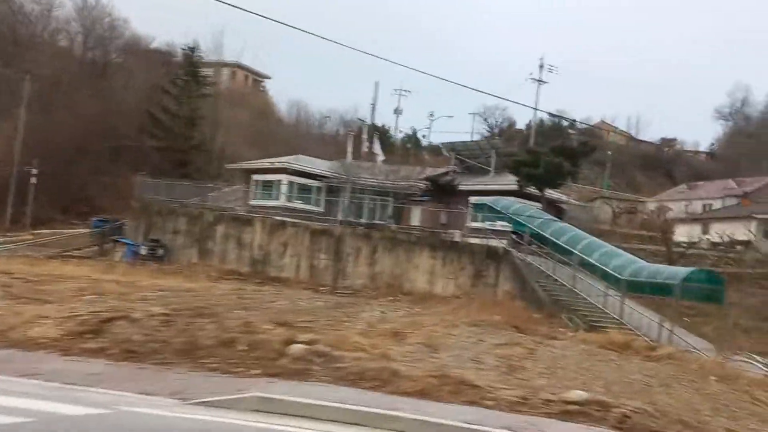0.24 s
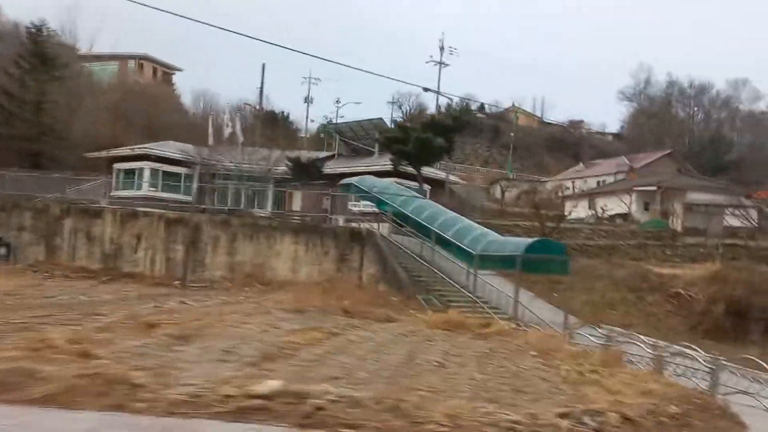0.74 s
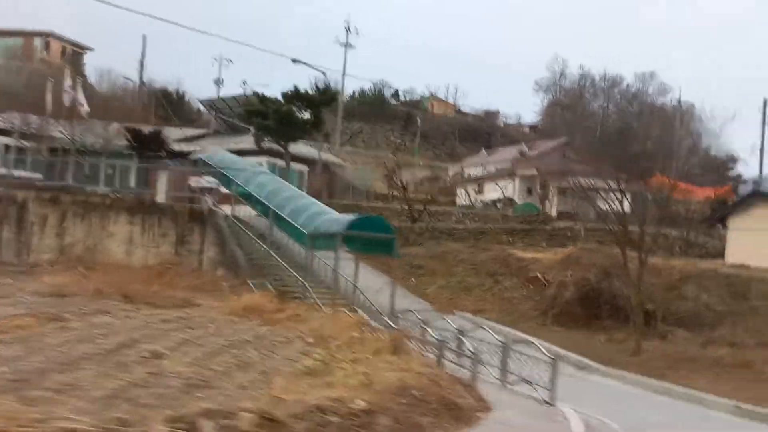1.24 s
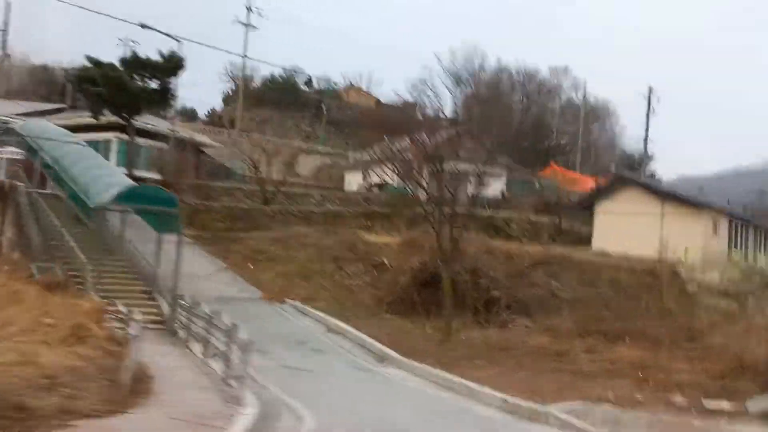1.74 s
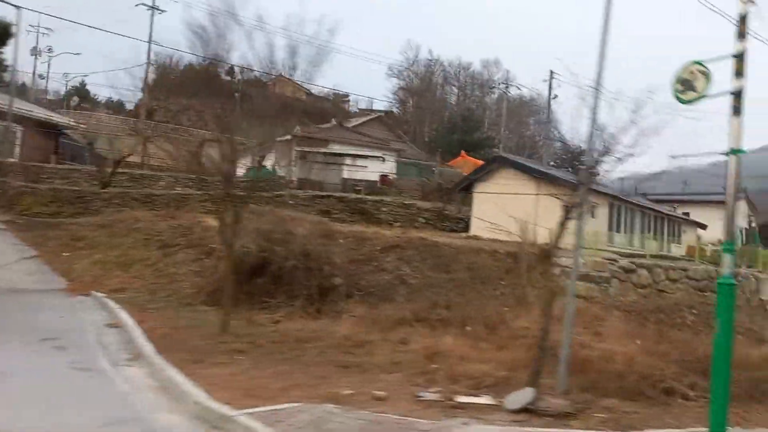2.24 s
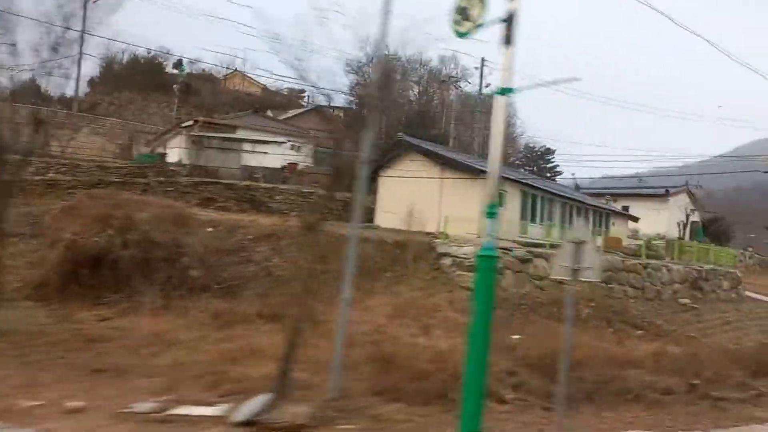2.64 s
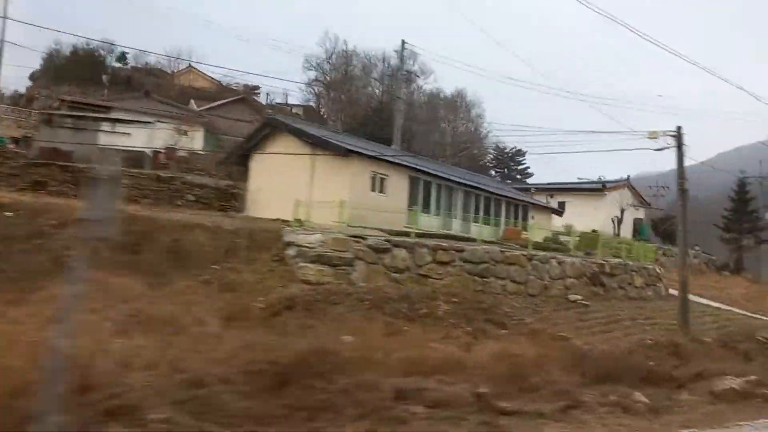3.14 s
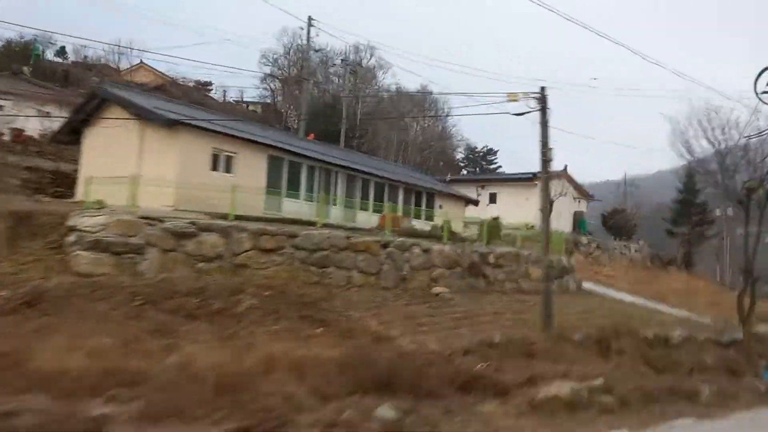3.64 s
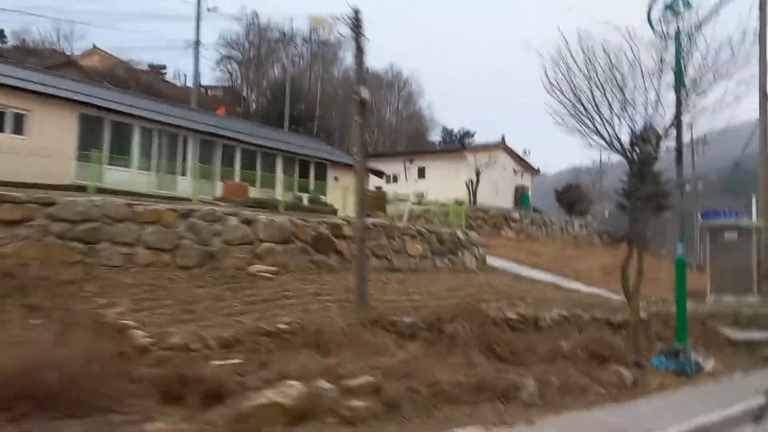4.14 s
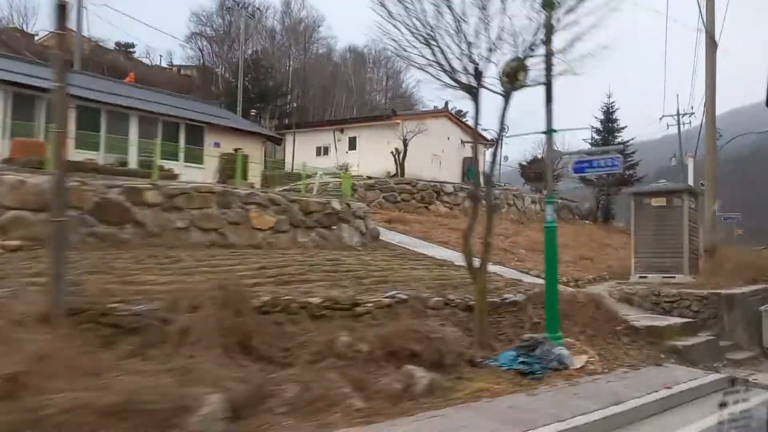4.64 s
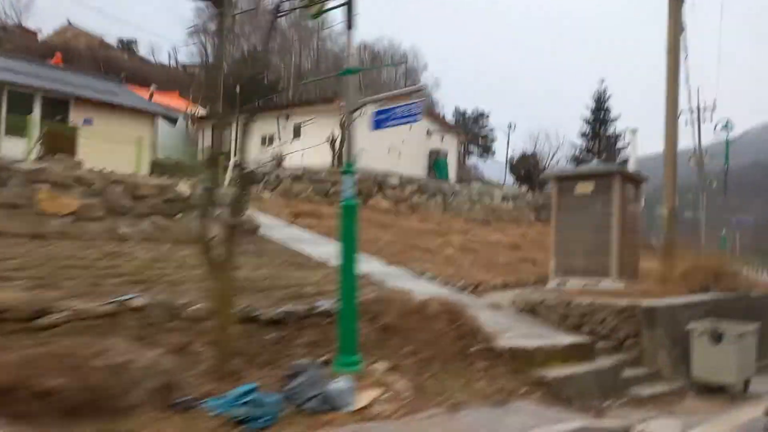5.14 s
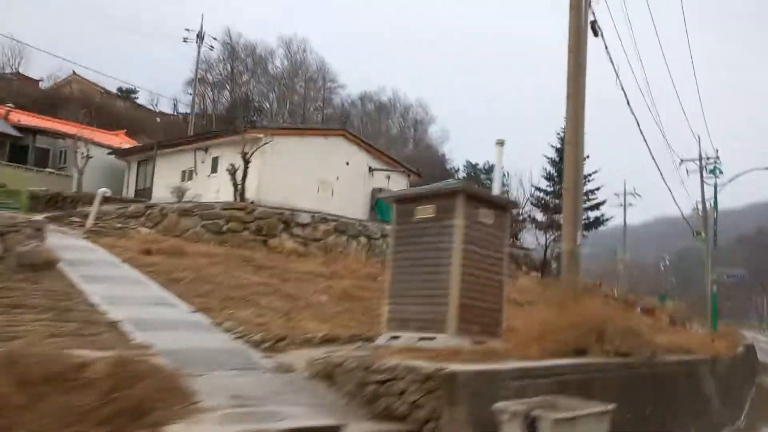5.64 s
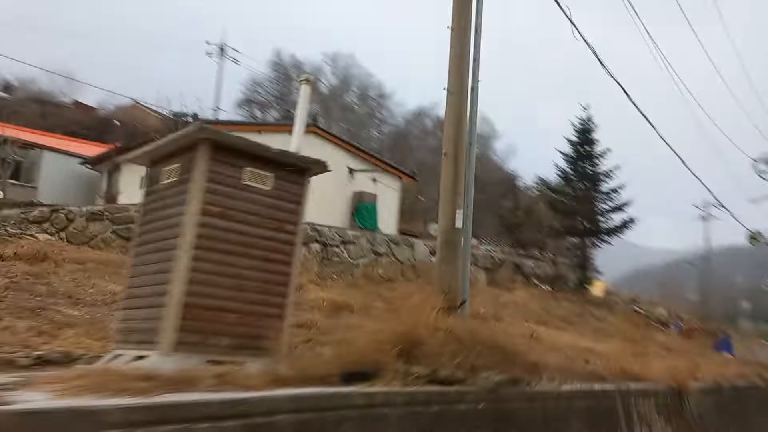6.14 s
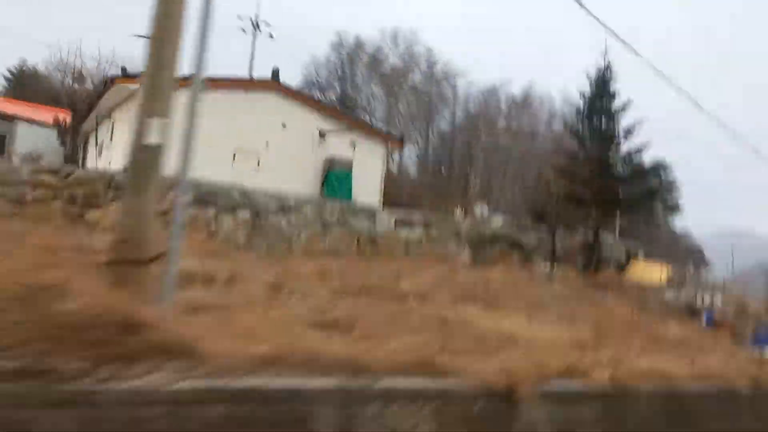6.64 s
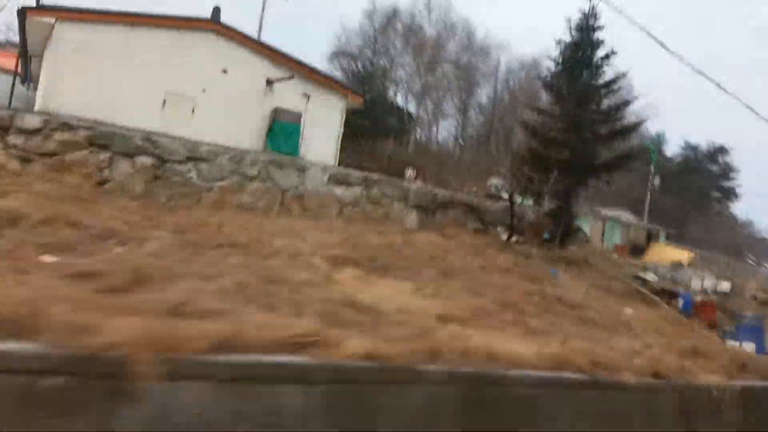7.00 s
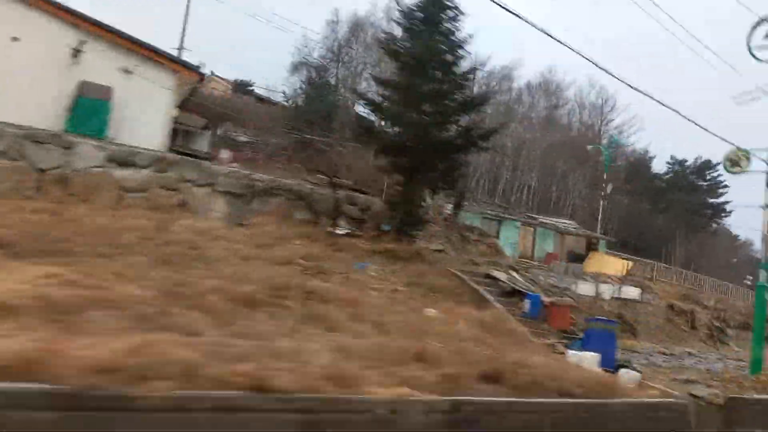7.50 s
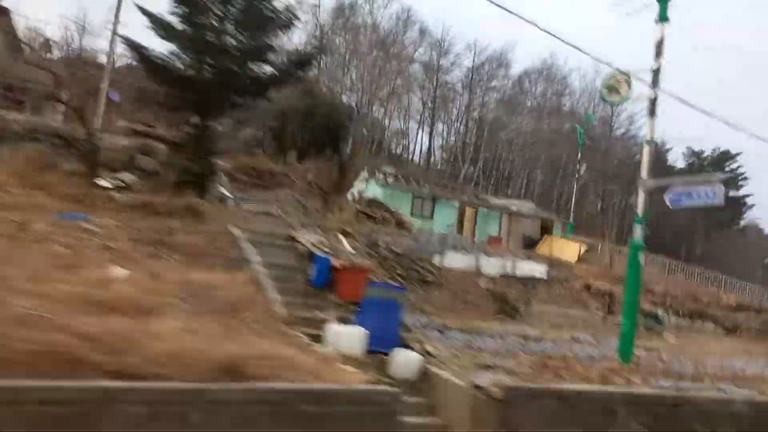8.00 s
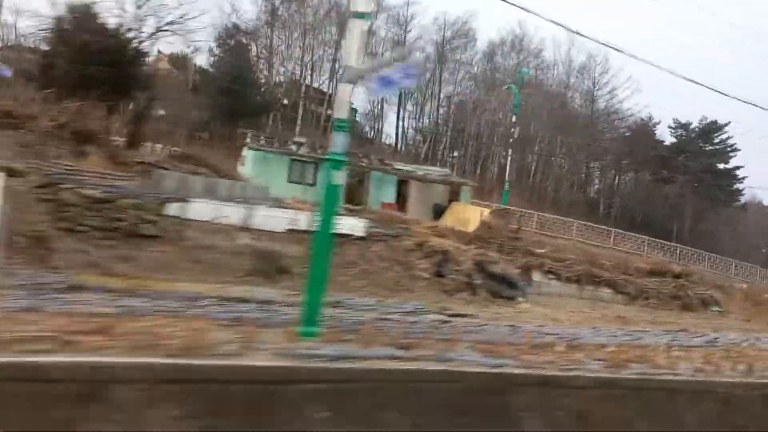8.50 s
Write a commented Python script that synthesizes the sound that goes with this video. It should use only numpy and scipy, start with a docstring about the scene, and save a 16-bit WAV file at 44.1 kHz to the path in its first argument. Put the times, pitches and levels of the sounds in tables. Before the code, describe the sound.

Inside a bus gathering speed on a country road, a deep diesel drone climbs while two rough patches thump, boom and rattle the cabin.

```python
"""Inside a bus that speeds up along a country road. From the start a six-cylinder diesel drones in harmonics of its
firing rate, gears hum with it, a steady whine sits near 1 kHz, and shaped noise gives road rumble, rattle and hiss.
Soft noise scuffs pass; then two rough patches bring sagging sine thuds, a booming body and clattering fittings,
with dry filtered ticks and modal knocks in and between them. Two microphones hear the bass alike, the treble apart."""
import sys
import numpy as np
from scipy import signal
from scipy.io import wavfile
from scipy.ndimage import uniform_filter1d

SR = 44100
rng = np.random.default_rng(int(sys.argv[2]) if len(sys.argv) > 2 else 0)


def unload_audio(sound):
    """Save the sound as a 16-bit wav file, at the path given as the first command line argument."""
    columns = np.transpose(np.atleast_2d(sound))
    # keep every value between -1 and 1, then stretch to whole-number steps
    steps = np.round(np.clip(columns, -1, 1) * 32767)
    wavfile.write(sys.argv[1], SR, steps.astype(np.int16))


N = 386316
TIME = np.arange(N) / SR
COARSE_STEP = 16  # low tones need few samples
COARSE = np.arange(N // COARSE_STEP + 40) * COARSE_STEP / SR

# engine speed and load, the firing tone being the measure of load: (time [s], firing rate [Hz], firing tone [dB])
ENGINE = [(0.0, 56.6, -25.5), (0.65, 57.3, -29.5), (0.96, 58.65, -32.5), (1.4, 60.7, -27),
          (1.9, 63.46, -30), (2.25, 64.36, -34.5), (2.7, 66.98, -23.5), (3.0, 68.15, -26.5),
          (3.5, 70.31, -23), (4.1, 72.37, -31), (4.5, 75, -26), (4.85, 75.15, -35.5), (5.5, 76.35, -27.5),
          (5.9, 76.85, -22), (6.5, 78.9, -29.5), (6.9, 79.27, -23), (7.38, 79.67, -26), (7.7, 80.58, -22),
          (8.32, 83.89, -19), (8.76, 86.8, -24)]
# likeness of the sound at the two microphones: (frequency [Hz], correlation [1])
LIKENESS = [(60, .99), (130, .975), (290, .8), (640, .15), (1410, 0), (15000, 0)]
# balance of the two microphones: (frequency [Hz], left over right [dB])
BALANCE = [(30, 3), (170, 1.3), (330, 5), (600, 0), (1200, -1), (2700, -1.5), (3500, -8.5), (4200, -11),
           (5200, -1.5), (6400, 4.5), (9800, 2), (13000, -9.5)]
LAG_S = 0.00012  # the bass reaches the left microphone later
BOOM_T60_S, RATTLE_T60_S, HISS_T60_S = 0.3, 0.52, 0.7  # decay after each jolt


def amp(db):
    """Decibels to amplitude ratio."""
    return 10 ** (np.asarray(db) / 20)


def evened(x):
    """Normalisation to unit effective (RMS) value."""
    return x / np.sqrt(np.mean(x ** 2) + 1e-20)


def read(points, hz):
    """Interpolation along a logarithmic frequency axis."""
    f, value = np.transpose(points)
    return np.interp(np.log(hz + 1), np.log(f + 1), value)


def curves(rows, t=TIME):
    """Linear interpolation of each column in time."""
    s, *columns = np.transpose(rows)
    return [np.interp(t, s, c) for c in columns]


def sides(db):
    """Level difference between the sides of a stereo pair, half to each."""
    return amp(np.array([[0.5], [-0.5]]) * db)


def add(mix, s, sound):
    """Superposition of a short sound on the mix at a given time."""
    part = mix[:, round(s * SR):][:, :sound.shape[1]]
    part += sound[:, :part.shape[1]]


def band(x, low_hz, high_hz):
    """Band-pass filtering by a Butterworth network."""
    edges = np.clip([low_hz, high_hz], 100, 20000)
    return signal.sosfilt(signal.butter(4, edges, "band", fs=SR, output="sos"), x)


def drift(per_s):
    """Slow random modulation: normal values joined by straight lines."""
    return np.interp(COARSE * per_s, np.arange(400), rng.standard_normal(400))


def tone(hz, db, waver, locked=False):
    """Phase-modulated sine; as likeness falls with frequency, the microphones differ more in phase."""
    start = rng.random() * (not locked)  # [cycles]
    phase = 2 * np.pi * (np.cumsum(hz) * COARSE[1] + start) + waver * drift(6.0)
    same = np.clip(read(LIKENESS, hz), -1, 1)
    apart = np.arccos(same) * rng.uniform(-1.3, 1) + 2 * np.pi * LAG_S * hz * same
    return np.sqrt(2) * amp(db) * sides(read(BALANCE, hz)) * np.sin([phase, phase + apart])


def noise(spectra, size, patchy_db, flicker_db):
    """Short-time synthesis of partly coherent stereo noise; its colour follows the engine speed."""
    frames, hz = N // (size // 4) + 5, np.fft.rfftfreq(size, 1 / SR)
    a, b, c, d, patches = rng.standard_normal((frames, len(hz), 5)).T
    patches = uniform_filter1d(patches, size=8, axis=0)  # along frequency
    patches = evened(uniform_filter1d(patches, size=12, axis=1))  # along time
    flicker = evened(uniform_filter1d(rng.standard_normal(frames), size=5))

    same = np.clip(read(LIKENESS, hz), -1, 1)[:, None]
    left = a + 1j * b
    right = same * left + np.sqrt(1 - same ** 2) * (c + 1j * d)
    right = right * np.exp(2j * np.pi * LAG_S * hz[:, None] * same)

    firing_hz = curves(ENGINE, np.arange(frames) * size / 4 / SR)[0]
    fast = np.clip((firing_hz - 68.0) / 13.0, 0, 1)
    slow_db = np.outer(read(spectra[0], hz), 1 - fast)
    fast_db = np.outer(read(spectra[-1], hz), fast)
    colour = amp(slow_db + fast_db)
    colour /= np.linalg.norm(colour, axis=0)

    z = np.array([left, right]) * colour * amp(patchy_db * patches + flicker_db * flicker)
    z *= amp(np.multiply.outer([0.5, -0.5], read(BALANCE, hz)))[:, :, None]
    return evened(signal.istft(z, nperseg=size, noverlap=3 * size // 4)[1][:, :N])


def engine_state():
    """Firing rate, firing level and the swell of the load about its mean."""
    hz, firing_db = curves(ENGINE, COARSE)
    return hz, firing_db, firing_db - np.mean(firing_db)


def multiples(rows, drift_db, drift_per_s, waver):
    """Tones locked in ratio to the firing rate, weighted by the transfer response of the cabin."""
    # how the cabin favours or swallows tones: (frequency [Hz], gain [dB])
    cabin_gain = [(85, -8), (95, -6.5), (103, -2), (112, -7.5), (124, 3.5), (135, -4), (150, -11),
                  (170, -9.5), (215, 5), (240, -9.5), (260, -0.5), (275, -11.5), (292, -2.5), (320, -11),
                  (331, 6.5), (342, 0), (353, -1), (362, -20), (372, 6.5), (384, 6.5), (392, -4.5),
                  (403, -37), (440, -9), (480, -9.5), (520, -5), (570, 0.5), (620, -16)]
    hz, _, swell_db = engine_state()
    total = 0
    for k, db, share in rows:
        level_db = db + read(cabin_gain, k * hz) + share * swell_db + drift_db * drift(drift_per_s)
        total = total + tone(k * hz, level_db, waver=waver)
    return total


def firing():
    """Periodic combustion: a fundamental at the firing rate, with tones at higher multiples."""
    # (multiple of the firing rate [1], level before cabin gain [dB], share of the load swell [1])
    orders = [(1.5, -29.5, 0.2), (2, -30, 0.3)]
    hz, firing_db, _ = engine_state()
    fundamental = tone(hz, firing_db + 1.5 * drift(6.0), waver=0.051, locked=True)  # no random start phase
    return fundamental + multiples(orders, drift_db=2.0, drift_per_s=3.5, waver=0.061)


def gears():
    """Gear hum: fixed ratios tie each tone to the firing rate, strong phase modulation roughens it."""
    # (multiple of the firing rate [1], level before cabin gain [dB], share of the load swell [1])
    hums = [(3.77, -41, 0.3), (5.57, -43.5, 0.21), (7.55, -55, 0.18)]
    return multiples(hums, drift_db=2.05, drift_per_s=7.0, waver=0.88)


def uneven_cylinders():
    """Subharmonic spacing: unequal cylinders give weak tones a sixth of the firing rate apart."""
    # mean level of these tones as the cabin passes them: (frequency [Hz], level [dB])
    uneven = [(30, -67.5), (60, -50.5), (90, -43), (115, -42), (135, -47.5), (165, -55), (190, -47),
              (220, -51.5), (250, -53.5), (285, -51.5), (330, -55.5), (400, -67.5), (480, -62),
              (600, -73.5), (800, -91)]
    hz, _, swell_db = engine_state()
    sixths = np.setdiff1d(np.arange(3, 54), [6, 9, 12])  # the strong tones stand in firing()
    return sum(tone(k * hz, read(uneven, k * hz) + 0.62 * swell_db + 2.0 * drift(2.5), waver=0.15)
               for k in sixths / 6)


def whine():
    """Narrow-band tone of steady pitch, perhaps a pump or fan, above a fuzzier one, mostly fainter."""
    # (time [s], level [dB])
    whine_level = [(0.0, -58.5), (2.4, -57.5), (3.6, -59.5), (4.6, -63.5), (5.6, -63.5), (7.3, -65),
                   (7.7, -73), (8.1, -64.5), (8.76, -64)]
    whine_hz, under_hz, under_db = 997, 955, -68
    whine_db = curves(whine_level, COARSE)[0] + 0.8 * drift(15.0)
    thin = tone(whine_hz + 0 * COARSE, whine_db, waver=0.55)
    return thin + tone(under_hz + 0 * COARSE, under_db + 3.0 * drift(9.5), waver=1.5)


def jolted(column, t60):
    """Power summation of the jolts: each grows exponentially to its peak, then decays."""
    # wheels on rough ground, levels before later gains:
    # (time of peak [s], build-up [s], boom [dB], rattle [dB], hiss [dB])
    jolts = [(3.66, 0.04, -10, -59, -79), (3.741, 0.035, -9, -46, -63), (3.85, 0.34, -14.5, -56, -61.5),
             (3.94, 0.11, -18, -52, -64), (4.01, 0.015, -34, -44, -52), (4.101, 0.086, -8.5, -60, -61),
             (4.18, 0.076, -6.5, -41.5, -53), (4.31, 0.072, -17.5, -44.5, -61),
             (5.75, 0.042, -39, -72, -70), (5.88, 0.036, -35, -52, -55), (6.1, 0.034, -35, -58, -58),
             (6.199, 0.021, -8, -47, -57), (6.28, 0.035, -9, -40.5, -49.5), (6.369, 0.08, -6.5, -37.5, -56),
             (6.49, 0.21, -14, -40.5, -49), (6.6, 0.029, -21, -49.5, -57), (6.68, 0.069, -14.5, -50.5, -60),
             (6.75, 0.14, -18.5, -51.5, -64), (6.83, 0.057, -28, -51, -56)]
    build_db = 9  # growth over one build-up time
    power = np.zeros(len(COARSE))
    for row in jolts:
        late = COARSE - row[0]
        shape_db = np.where(late < 0, build_db * late / row[1], -60 * late / t60)
        power += amp(row[column] + shape_db) ** 2
    return np.interp(TIME, COARSE, np.sqrt(power))


def rumble(level):
    """Structure-borne noise: tyres rumble through the floor, more so at each jolt."""
    # spectra at low and at high speed: (frequency [Hz], relative density [dB per Hz])
    rumble_spectra = [
        [(12, -42), (20, -37.5), (59, 0), (109, 0.5), (163, -9.5), (225, -5), (270, -19.5), (335, -15),
         (401, -17), (812, -31.5), (1010, -36), (1080, -40), (1500, -44), (1950, -78.5), (3300, -120)],
        [(12, -46.5), (20, -35.5), (51, -5), (86, -2), (136, -10), (185, -16), (285, -12.5), (329, -21),
         (566, -23), (857, -34.5), (990, -36), (1500, -50), (1950, -69.5), (3300, -120)],
    ]
    level = np.hypot(level, amp(-10.5) * jolted(column=2, t60=BOOM_T60_S))
    return level * noise(rumble_spectra, size=4096, patchy_db=2.0, flicker_db=-0.58)


def rattle(level):
    """Contact noise of the fittings: a running chatter plus the shaking that jolts excite."""
    # spectra at low and at high speed: (frequency [Hz], relative density [dB per Hz])
    chatter_spectra = [
        [(620, -36.5), (1050, 1.5), (1530, -8.5), (1780, 1), (2420, -5), (2700, -7.5), (3940, -7.5),
         (5020, -13), (6280, -18.5), (7250, -17.5), (8080, -28), (9000, -42.5), (11700, -56), (19800, -120)],
        [(620, -21.5), (1050, 5.5), (1550, -1), (2060, 0.5), (2250, 0.5), (2490, -1.5), (3090, -5),
         (4040, -8.5), (4880, -15.5), (6110, -15), (7320, -15.5), (9000, -38), (11700, -45.5), (19800, -120)],
    ]
    # spectrum under a jolt: (frequency [Hz], relative density [dB per Hz])
    shaken_spectrum = [(620, -20.5), (1050, 2.5), (1500, -1), (2100, 1), (2700, -6.5), (3200, -3.5),
                       (3900, 0), (4450, -8.5), (4900, -9.5), (6200, -13.5), (7300, -13), (8300, -31),
                       (11700, -46), (19800, -120)]
    chatter = noise(chatter_spectra, size=256, patchy_db=1.2, flicker_db=0.7)
    shaken = noise([shaken_spectrum], size=256, patchy_db=1.2, flicker_db=0.0)
    return level * chatter + jolted(column=3, t60=RATTLE_T60_S) * shaken


def hiss(level):
    """Broadband air noise at the window, amplitude-modulated by random puffs and raised by jolts."""
    # spectra at low and at high speed: (frequency [Hz], relative density [dB per Hz])
    hiss_spectra = [
        [(4710, -26.5), (8000, -6), (9490, -4), (10200, -2.5), (11100, 4), (11800, 5.5), (13700, 2),
         (16000, -26)],
        [(4710, -29.5), (8000, -4), (8360, -10.5), (8850, -6), (10000, -1.5), (13300, 4.5), (15100, 3.5),
         (16000, -12.5)],
    ]
    puffs_per_s, puff_db, puff_s = 6.3, 7, 0.04  # mean rate, largest single jump, time constant
    jumps = (rng.random(N) < puffs_per_s / SR) * rng.random(N)
    puffs = signal.oaconvolve(jumps, np.exp(-TIME[:9000] / puff_s))[:N]
    level = np.hypot(level * amp(puff_db * puffs), jolted(column=4, t60=HISS_T60_S))
    return level * noise(hiss_spectra, size=256, patchy_db=1.5, flicker_db=0.25)


def road():
    """Superposition of the three broadband noises of travel."""
    # levels on even road: (time [s], rumble [dB], rattle of fittings [dB], window hiss before puffs [dB])
    even_road = [(0.0, -24.5, -48, -57), (0.12, -30.5, -53.5, -65.5), (0.48, -31, -56, -70),
                 (0.66, -30, -54.5, -64), (0.83, -31.5, -56, -69.5), (1.22, -26, -53, -66),
                 (2.0, -26.5, -52.5, -67.5), (3.3, -25, -52.5, -70), (4.5, -30, -53.5, -66.5),
                 (5.2, -31.5, -56, -69), (5.8, -26, -51, -64), (7.05, -31, -52, -62.5),
                 (7.56, -30.5, -53, -62), (8.0, -28, -50.5, -60.5), (8.76, -26.5, -53, -68.5)]
    rumble_level, rattle_level, hiss_level = amp(curves(even_road))
    return rumble(rumble_level) + rattle(rattle_level) + hiss(hiss_level)


def scuff(db, hz, width, rise, t60, pan_db):
    """Band-limited noise around one centre, with a linear rise and exponential decay."""
    t = np.arange(SR // 3) / SR
    puff = band(rng.standard_normal((len(t), 2)).T, hz - width / 2, hz + width / 2)
    return amp(db - 60 * t / t60) * sides(pan_db) * evened(puff) * np.minimum(t / rise, 1)


def thud(db, hz, t60):
    """Damped oscillation from a wheel striking an edge: a low push that sags in pitch as it decays."""
    t = np.arange(9000) / SR
    swing = np.sin(2 * np.pi * hz * t * (1 - 0.5 * t))
    push = amp(db - 60 * t / t60) * swing * np.minimum(t / 0.00404, 1)
    return sides(1.8) * push


def body():
    """Forced vibration: the body booms over rough ground, its swings held fairly even."""
    # (frequency [Hz], relative density [dB per Hz])
    boom_spectrum = [(15, -44), (25, -20), (61, -2), (81, 5.5), (139, -10.5), (261, -8.5), (311, -26.5),
                     (343, -10.5), (470, -34.5), (650, -57), (1100, -120)]
    boom = noise([boom_spectrum], size=4096, patchy_db=3.0, flicker_db=-4.5)
    swing = np.sqrt(uniform_filter1d((boom ** 2).mean(0), size=1200) + 0.074)
    return amp(-15) * jolted(column=2, t60=BOOM_T60_S) * boom / swing


def fitting(treble_db):
    """Modal impulse response of a loose fitting, tilted in dB per octave above 2600 Hz."""
    # (frequency [Hz], level before tilt [dB], decay time t60 [s])
    modes = [(2120, -15, 0.013), (2550, 6, 0.0046), (3000, -12, 0.0048), (4100, 1.5, 0.0062),
             (4500, -10, 0.0074), (5760, -5.5, 0.0066), (7200, -5, 0.0072), (10100, 0, 0.0024),
             (12900, -7, .003)]
    t = np.arange(1500) / SR
    ring = 0
    for hz, mode_db, t60 in modes:
        tilt_db = treble_db * max(np.log2(hz / 2600), 0)
        ring = ring + amp(mode_db + tilt_db - 60 * t / t60) * np.sin(2 * np.pi * hz * t)
    return ring[None] * np.minimum(t / 0.00035, 1)


def clatter():
    """Random impulses excite the fitting's modes, left or right, following the shaking but weaker."""
    taps_per_s, spread_db = 250, -2.5  # mean rate on each side, scale of the random weakening
    taps = rng.random((2, N)) < taps_per_s / SR
    taps = taps * amp(spread_db * np.minimum(rng.exponential(1, (2, N)), 3))
    rings = signal.oaconvolve(taps, fitting(treble_db=-6.0), axes=1)[:, :N]
    return amp(-9.5) * jolted(column=3, t60=RATTLE_T60_S) * evened(rings)


def tick(db, top_hz, treble_db, pan_db):
    """Filtered unit impulse: a broad dull part and a weaker bright edge."""
    snap = signal.unit_impulse(400)
    dull = band(band(snap, 400, top_hz), 300, top_hz * 1.15)
    bright = band(snap, 5000, 15800)
    click = dull / abs(dull).max() + amp(treble_db) * bright / abs(bright).max()
    return amp(db) * sides(pan_db) * click


def knock(db, treble_db, blow_t60, pan_db):
    """Convolution of an uneven, decaying blow with the modes of the fitting."""
    t = np.arange(800) / SR
    blow = (t == 0) + 0.3 * rng.standard_normal((2, len(t))) * amp(-60 * t / blow_t60)
    ring = signal.fftconvolve(blow, fitting(treble_db), axes=1)
    return amp(db) * sides(pan_db) * ring / abs(ring).max()


def scene():
    """Linear superposition of the lasting sounds and the timed events."""
    # (time [s], level before rise and decay [dB], centre [Hz], width [Hz], rise [s], t60 [s], left-right [dB])
    scuffs = [(0.632, -62, 11300, 3500, .002, .15, -5), (1.252, -63, 11660, 3000, .002, .2, -5),
              (3.708, -36, 2070, 1100, 0.004, 0.23, -4), (3.715, -35.5, 1750, 300, 0.008, 0.23, -2),
              (3.76, -37, 1950, 600, .004, 0.05, -1), (3.905, -42.5, 1850, 900, .01, 0.18, 0),
              (4.0, -44.5, 12300, 4000, .001, .2, 0), (4.0, -48, 4500, 5000, .001, 0.37, 5),
              (5.87, -53, 9000, 6000, 0.0011, .12, 0), (6.077, -60, 11050, 8000, .001, .15, 0),
              (6.242, -45, 13000, 4007, .006, 0.18, -4), (6.81, -55, 4944, 4500, .004, 1, 0)]
    # wheel on an edge: (time [s], level before rise and decay [dB], initial pitch [Hz], t60 [s])
    thuds = [(3.628, -12, 95, .07), (3.654, -5.5, 205, 0.067), (3.676, -10.5, 90.6, 0.38),
             (3.742, -13, 88.6, 0.1), (3.786, -3.5, 95, 0.075), (3.829, -12, 86.4, 0.24),
             (3.928, -8.5, 89.45, 0.2), (4.036, -6, 100, 0.1), (4.08, -1.5, 97, 0.09),
             (4.124, -10, 148, .06), (4.154, -2, 168, 0.04), (4.16, -5.5, 79.1, 0.29),
             (4.206, -9.5, 224, 0.034), (4.27, -14, 73.5, 0.16), (5.778, -8, 189, 0.047),
             (5.856, -11.5, 83, 0.21), (6.175, -18, 345, 0.095), (6.148, -10.5, 100, 0.19),
             (6.188, -7, 95, 0.066), (6.224, 0, 92.5, 0.047), (6.266, -6.5, 81, 0.25),
             (6.336, -8.5, 268, 0.043), (6.345, -4.5, 87, .11), (6.446, -9, 94, 0.061),
             (6.532, -2.5, 84.5, 0.047), (6.57, -5.5, 89, 0.05), (6.672, -15, 91, 0.053),
             (6.72, -8, 84.5, 0.19), (6.812, -10.5, 91.96, 0.076)]
    # dry and close: (time [s], dull peak [dB], top of dull part [Hz], treble over dull [dB], left-right [dB])
    ticks = [(4.0005, -42, 7000, -3, 0), (4.6322, -42, 1500, -25, -15), (4.805, -38, 4500, -26, -21),
             (4.8427, -39, 3992, -13, -17), (4.867, -37.5, 4600, -7, -21), (4.8854, -40, 4500, -12, -6.5),
             (4.893, -36, 4000, -14, -16), (4.9109, -36, 4000, -12, -24), (4.9172, -35, 4500, -30, -9),
             (4.9449, -33.5, 4400, -14, -22), (6.7159, -26, 4160, -45, -22)]
    # (time [s], peak before panning [dB], treble tilt [dB per octave], t60 of the blow [s], left-right [dB])
    knocks = [(4.1659, -34, -10, .015, 9), (6.3733, -17, -2.5, 0.016, 7), (6.4412, -17.5, -4.5, 0.02, -0.5),
              (6.4945, -30, -1, .01, 6), (6.5085, -26.5, -13, 0.021, 4)]
    tones = firing() + gears() + uneven_cylinders() + whine()
    tones = signal.resample_poly(tones, COARSE_STEP, 1, axis=1, padtype="edge")[:, :N]
    cabin = tones + road() + body() + clatter()
    for table, sound in [(scuffs, scuff), (thuds, thud), (ticks, tick), (knocks, knock)]:
        for s, *row in table:
            add(cabin, s, sound(*row))
    return cabin


def record(dry):
    """Microphone high-pass, soft saturation of strong swings and a linear-phase band limit."""
    ceiling, edge_hz = 0.75, 15870  # limit of the saturation [full scale], band edge
    eased = dry * np.minimum(np.minimum(TIME, TIME[::-1]) * 200, 1)  # 5 ms at both ends
    thinned = signal.sosfilt(signal.butter(2, 40.0, "high", fs=SR, output="sos"), eased)
    squashed = thinned / (1 + (thinned / ceiling) ** 4) ** 0.25
    low_pass = signal.firwin(1023, edge_hz, window=("kaiser", 9), fs=SR)
    return signal.oaconvolve(squashed, low_pass[None], "same")


dry = scene()
out = record(dry)
unload_audio(out)
```